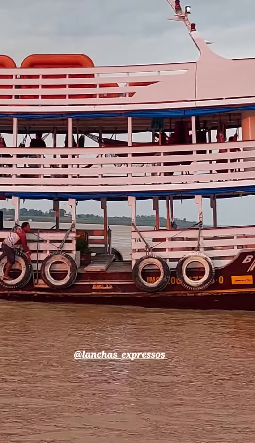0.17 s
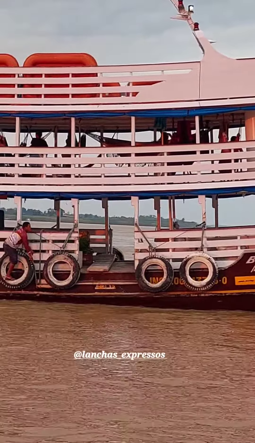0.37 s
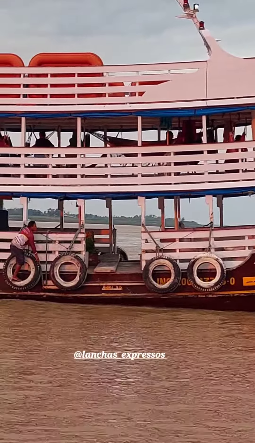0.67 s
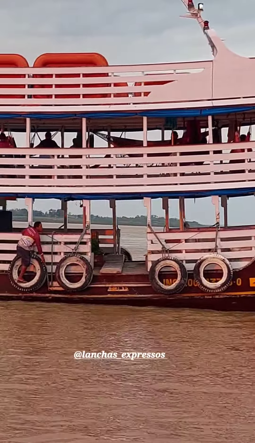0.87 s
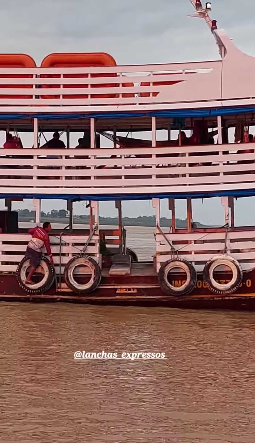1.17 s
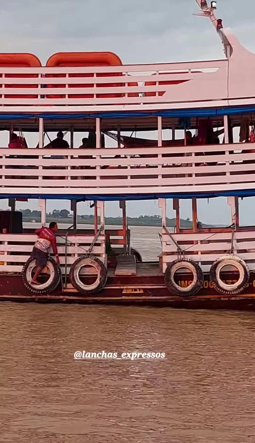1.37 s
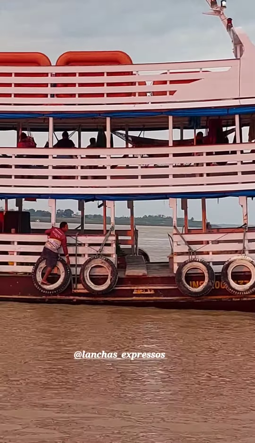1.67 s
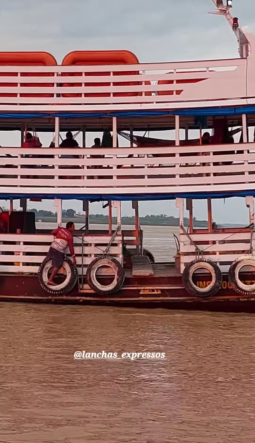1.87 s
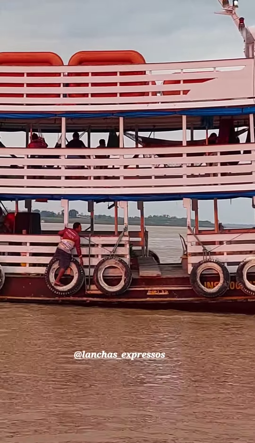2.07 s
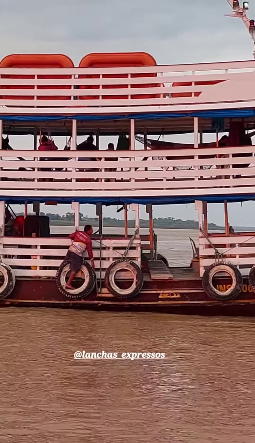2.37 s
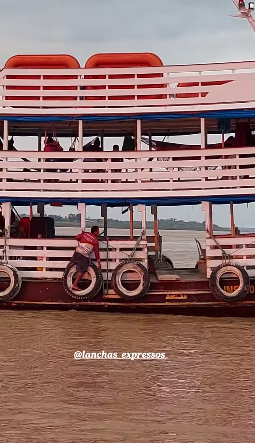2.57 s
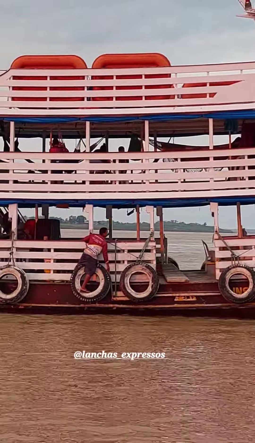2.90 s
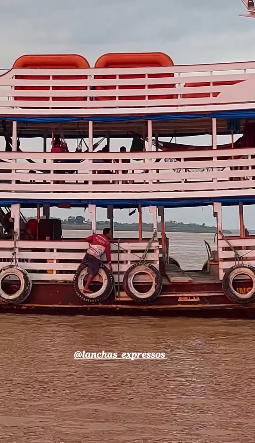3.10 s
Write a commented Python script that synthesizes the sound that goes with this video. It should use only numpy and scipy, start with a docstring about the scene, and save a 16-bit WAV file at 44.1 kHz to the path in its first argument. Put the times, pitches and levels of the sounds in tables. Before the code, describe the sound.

A riverboat's slow diesel chugs about fourteen times a second, each beat a deep thump with raspy exhaust and bright knock. Water wash and small splashes sit beneath, outdoors, with low wind rumble on the stereo microphone.

```python
"""Slow diesel on a river boat

A slow diesel fires about fourteen times a second. Each firing sets the exhaust pipe ringing with a thump,
sends a rasp of filtered noise from its mouth and knocks brightly in the block. Water washes along the hull
as noise and drops, with ringing bubbles, crackling splashes and three dull slaps, the first one faint.
Wind rumbles as lumpy low noise on the two microphone ports. The left port is duller and quieter than the right.
"""
import sys
import numpy as np
from scipy import signal
from scipy.fft import rfft, irfft, next_fast_len
from scipy.io import wavfile
from scipy.ndimage import uniform_filter1d

SR = 44100
rng = np.random.default_rng(int(sys.argv[2]) if len(sys.argv) > 2 else 0)


def wrap_up_sound(samples):
    """Save the sound to the file named by the first command line argument, as 16-bit audio."""
    columns = np.atleast_2d(samples).T
    # keep every value between -1 and 1, then stretch to whole-number steps
    tamed = np.clip(columns, -1, 1)
    steps = np.round(tamed * 32767).astype(np.int16)
    wavfile.write(sys.argv[1], SR, steps)


def how_loud(loudness_db):
    """Turn decibels into a plain amplitude multiplier (0 dB gives 1, 20 dB gives 10)."""
    steps = np.asarray(loudness_db, float) / 20
    return 10 ** steps


N = 142884  # length in samples

# Engine load over time, as level changes of its sounds: start_s, thump_db, upper_pipe_modes_db, rasp_db, knock_db
ENGINE_LOAD = [(0, -1, 1, -0.5, -2), (.35, -0.5, 0.5, -2, -1.5), (.9, 0.5, 0, 0, -1.5),
               (1.3, .5, 0.5, -2, 0), (1.65, -0.5, -2, -1.5, -1.5), (1.9, 0, -1, 0, -2),
               (2.3, -.5, -0.5, -0.5, -1.5), (3.24, -0.5, 1.5, -2.5, -1.5)]
# Ringing tones (modes) of exhaust pipe and hull: pitch_hz, level_db, t60_s (time to fade by 60 dB, one pass),
# sign (1 or -1), drift_db_per_s, swells (1 = rings through two equal resonances in a row)
PIPE_MODES = [(59.7, -10.6, .077, 1, -.5, 0), (71.2, -19.1, .33, 1, 0, 0), (77.8, -9.3, .065, -1, 0, 1),
              (103.9, -22.3, .33, -1, -2, 0), (148.1, -13.2, .122, -1, 0, 0),
              (244.5, -20.2, .13, -1, 2.2, 0), (297.7, -11.6, .028, 1, 0, 1), (390.9, -19.5, .057, 1, 1, 0)]
# Reflections of the thump: delay_s, gain (plain factor)
THUMP_ECHOES = [(.01665, .35)]
# Resonances of the gas rasp: pitch_hz, width_hz (one pass), level_db, left_lead_radians
RASP_RESONANCES = [(776, 243, -3, -1.32), (1158, 290, -4.5, -0.19), (1374, 208, 0.5, 1),
                   (1851, 146, 1, -1.3), (2097, 517, -0.5, .9)]
# Resonances of the knock: pitch_hz, width_hz (one pass), left_db, right_db, left_lead_radians
KNOCK_RESONANCES = [(4340, 1900, 2, 2, -1), (5090, 1130, 12.5, 3.5, -1.5), (5500, 660, 12, -3, 1),
                    (6680, 520, 13, 1, -1)]
# Vigour of the wash over time: start_s, level_db (relative)
WASH_VIGOUR = [(0, -46), (.3, -52), (.6, -56.5), (.9, -57.5), (1.15, -51), (1.5, -51), (1.9, -48.5),
               (2.25, -52), (2.55, -48.5), (2.8, -55.5), (3.24, -59)]
# Tone colour of wash and spray: pitch_hz, level_db (relative, per hertz)
WATER_COLOUR = [(480, 3), (750, -2.5), (1000, -1), (1400, -3), (1600, -5), (1850, -0.5), (2200, -5),
                (2600, -8.5), (3300, -10.5), (5000, -9), (5900, -13.5), (6700, -11.5), (7400, -19.5),
                (8500, -27), (10000, -21.5), (13500, -17.5), (15600, -16.5)]
# Splashes against the hull: peak_s, level_db (at the peak), length_s (fade time), lowest_hz
HULL_SPLASHES = [(0.890, -30, .002, 9000), (1.387, -23, 0.003, 9000), (1.573, -25, .002, 10000),
                 (1.708, -30, 0.068, 2520), (1.77, -26, 0.0036, 9000), (1.893, -27, 0.006, 9500),
                 (2.03, -30, 0.031, 2740), (2.106, -22.5, 0.023, 3000), (2.174, -23.5, 0.0033, 8500),
                 (2.283, -28, .003, 10100), (2.336, -24, .002, 9000), (2.458, -29.5, 0.03, 2880),
                 (2.492, -29.5, 0.023, 3180), (2.665, -26, 0.018, 3000), (2.806, -32.5, 0.006, 8950),
                 (3.072, -29.5, 0.0023, 9100)]
# Single bubbles that ring clearly: start_s, pitch_hz (at the start), level_db, t60_s
CLEAR_BUBBLES = [(.0605, 3220, -21.5, .028), (.058, 800, -27, .05)]
# Waves slapping the hull: start_s, level_db
HULL_SLAPS = [(1.627, -22), (1.64, -11.5), (1.726, -13.5)]
# Tone colour of the wind rumble: pitch_hz, level_db (relative, per hertz)
RUMBLE_COLOUR = [(20, -5), (42, 4.5), (70, 10), (130, 6), (300, 5), (400, -2), (600, -35.5)]
# Left port's response compared with the right: pitch_hz, level_db
LEFT_PORT_COLOUR = [(60, -3), (320, -3.5), (750, -4), (1200, -7.5), (1850, -9.5), (2200, -11), (2700, -3),
                    (4200, -5), (5000, -8), (5700, -5), (6700, -16), (8000, -23), (10000, -19.5),
                    (15000, -18.5)]

# Engine timing and chance differences between firings
FIRST_FIRING_S, FIRING_PERIOD_S, FIRING_JITTER_S = .01019, .0699651, .00008
FIRING_SPREAD_DB, MODE_SPREAD_DB = 0.43, 0.08
# Thump: modes above UPPER_MODES_HZ start later, and later still on the left
THUMP_DB, THUMP_CUT_HZ, UPPER_MODES_HZ = 0.5, 1600, 220
THUMP_LEAD_S, UPPER_LAG_S, UPPER_LEFT_LAG_S, ECHO_DB_PER_S = .00154, .00055, .0002, -2
# Rasp: a main puff and a weaker, longer tail; likeness is between the ports (1 = the same)
RASP_DB, RASP_SPREAD_DB, RASP_LIKENESS, RASP_DELAY_S = -23, 2.5, .88, 0.0034
RASP_RISE_S, RASP_FALL_S, RASP_TAIL_S, RASP_TAIL_DB = 0.00078, 0.0038, 0.019, -10.5
KNOCK_DB, KNOCK_SPREAD_DB, KNOCK_LIKENESS = -31.5, 1.5, .8
KNOCK_DELAY_S, KNOCK_RISE_S, KNOCK_FALL_S = 0.0037, 0.00061, 0.0036
EVEN_S = .006  # stretch over which rasp and knock noise is evened out
# Wash: "follows" is the share of the vigour swing heard in the lowest and highest octave
WASH_DB, WASH_FOLLOWS_LOW, WASH_FOLLOWS_HIGH, WASH_PATCHY_DB = 20, 0.16, 0.88, 1.5
WASH_LIKENESS, WASH_ALIKE_BELOW_HZ, PORT_LAG_S = 0.3, 900, .0001
DROPS_PER_S, DROP_SIZE_DB, DROPS_DB = 300, 4, -12  # rate at average vigour
BUBBLES_PER_S, BUBBLE_CYCLES, BUBBLES_DB, BUBBLES_FOLLOW = 120, 20, -47, 1
RUMBLE_DB, RUMBLE_LIKENESS, RUMBLE_LUMPS_DB = -31, 0.84, 2
SPRAY_GRAIN_DB, SPRAY_GRAINS_PER_S, SPRAY_HISS_DB = 4, 3000, -4
PLOP_RISE = 0.066  # share by which a clear bubble's pitch climbs within t60
SLAP_HZ, SLAP_T60_S = 122, 0.17


def rms_one(x):
    """Scale to an average strength (rms) of 1."""
    return x / np.sqrt(np.mean(x ** 2) + 1e-20)


def in_time(rows, s=None):
    """Read a table's columns at the given times, or at every sample."""
    t, *columns = np.transpose(rows)
    s = np.arange(N) / SR if s is None else s
    return [np.interp(s, t, column) for column in columns]


def coloured(x, points):
    """Shape the spectrum by points joined with lines on a log-pitch axis."""
    size = next_fast_len(N + 4096)
    hz, db = np.transpose(points)
    bins_hz = np.arange(size // 2 + 1) * SR / size
    gain = how_loud(np.interp(np.log(bins_hz + 1), np.log(hz), db))
    return irfft(rfft(x, size) * gain, size)[..., :N]


def drift(rate):
    """Slow random wander of spread 1: noise smoothed above about rate hertz."""
    r = np.exp(-80 * np.pi * rate / SR)  # made at every 40th sample
    noise = rng.standard_normal(N // 40 + 2002)
    slow = rms_one(signal.lfilter([1], [1, -2 * r, r * r], noise)[2000:])
    return np.interp(np.arange(N) / 40, np.arange(len(slow)), slow)


def clicks(s, gains):
    """Clicks of the given heights at the given times, after one second of run-in."""
    out = np.full(N + 2 * SR, 1e-18)
    out[np.round((s + 1) * SR).astype(int)] = gains
    return out


def ring(x, hz, t60):
    """A unit click sets a fading sine of starting height 1 ringing."""
    r, w = how_loud(-60 / (t60 * SR)), 2 * np.pi * hz / SR
    return signal.lfilter([0, np.sin(w)], [1, -2 * r * np.cos(w), r * r], x)


def resonance(x, hz, width):
    """Steep band-pass, one resonance applied twice; white noise keeps its rms."""
    r = np.exp(-np.pi * width / SR)
    row = [(1 - r * r) / 2, 0, (r * r - 1) / 2, 1, -2 * r * np.cos(2 * np.pi * hz / SR), r * r]
    return signal.sosfilt([row, row], x) * np.sqrt(2 * SR / width / np.pi)


def even_band(x, hz, width):
    """Noise in one resonance, its slow swells evened out so that strokes find much the same strength."""
    band = resonance(x, hz, width)
    power = uniform_filter1d(band ** 2, size=int(EVEN_S * SR))
    return band / np.sqrt(power + 0.37)


def puffs(s, gains, rise, fall):
    """An envelope that swells and dies after every click."""
    a, b = np.exp(-1 / (rise * SR)), np.exp(-1 / (fall * SR))
    dying = signal.lfilter([1], [1, -b], clicks(s, gains))
    return signal.lfilter([1 - a], [1, -a], dying)[SR:SR + N]


def port_pair(x, alike, lag=PORT_LAG_S):
    """Two unrelated signals become a partly alike pair; the left's shared part lags (leads if negative)."""
    alike = np.clip(alike, 0, 1)
    shared = np.roll(x[1], int(np.round(lag * SR)))
    return np.array([alike * shared + np.sqrt(1 - alike ** 2) * x[0], x[1]])


def thump(s, db, upper_db):
    """Each firing strikes the pipe modes; a reflection follows and weakens steadily over time."""
    spread = rng.normal(0, MODE_SPREAD_DB, (len(s), len(PIPE_MODES)))
    age = s - N / SR / 2  # time from the middle of the sound
    pipe = 0
    for k, (hz, level_db, t60, sign, db_per_s, swells) in enumerate(PIPE_MODES):
        upper = hz > UPPER_MODES_HZ
        gains = how_loud(db + level_db + db_per_s * age + spread[:, k] + upper_db * upper)
        mode = ring(clicks(s - THUMP_LEAD_S + UPPER_LAG_S * upper, gains), hz, t60)
        if swells:
            # the factor brings the peak back to about the height of a single ring
            mode = ring(mode, hz, t60) * 2 * np.e * np.log(1000) / (t60 * SR)
        left = np.roll(mode, int(UPPER_LEFT_LAG_S * SR) * upper)
        pipe = pipe + sign * np.array([left, mode])
    pipe = signal.sosfilt(signal.butter(2, THUMP_CUT_HZ, fs=SR, output="sos"), pipe)
    echoes = sum(gain * np.roll(pipe, int(lag * SR), axis=1) for lag, gain in THUMP_ECHOES)
    fading = how_loud(ECHO_DB_PER_S * (np.arange(N) - N / 2) / SR)
    return how_loud(THUMP_DB) * (pipe[:, SR:SR + N] + echoes[:, SR:SR + N] * fading)


def rasp(s, db):
    """Turbulent gas follows each thump: puffs of noise, every resonance with its own share each time."""
    gas, out = rng.standard_normal((2, N)), 0
    start = s + RASP_DELAY_S
    for hz, width, level_db, lead in RASP_RESONANCES:
        gains = how_loud(db + level_db + rng.normal(0, RASP_SPREAD_DB, len(s)))
        gate = puffs(start, gains, RASP_RISE_S, RASP_FALL_S)
        gate = gate + how_loud(RASP_TAIL_DB) * puffs(start, gains, RASP_RISE_S, RASP_TAIL_S)
        band = resonance(even_band(gas, hz, width) * gate, hz, 1.82 * width)
        band = band * np.sqrt(np.pi * width / SR)
        out = out + port_pair(band, RASP_LIKENESS, -lead / (2 * np.pi * hz))
    return how_loud(RASP_DB) * out


def knock(s, db):
    """A short bright rattle of the block at each firing: a burst of noise through high resonances."""
    gains = how_loud(db + rng.normal(0, KNOCK_SPREAD_DB, len(s)))
    gate = puffs(s + KNOCK_DELAY_S, gains, KNOCK_RISE_S, KNOCK_FALL_S)
    rattle, out = rng.standard_normal((2, N)), 0
    for hz, width, left_db, right_db, lead in KNOCK_RESONANCES:
        pair = port_pair(even_band(rattle, hz, width), KNOCK_LIKENESS, -lead / (2 * np.pi * hz))
        out = out + pair * how_loud(np.array([[left_db], [right_db]]))
    return how_loud(KNOCK_DB) * gate * out


def engine():
    """Firings at a nearly steady rate drive thump, rasp and knock."""
    s = FIRST_FIRING_S + FIRING_PERIOD_S * np.arange(-6, 47)  # early ones are already ringing at the start
    s = s + rng.normal(0, FIRING_JITTER_S, len(s))
    thump_db, upper_db, rasp_db, knock_db = in_time(ENGINE_LOAD, s)
    shared_db = rng.normal(0, FIRING_SPREAD_DB, len(s))
    blows = thump(s, thump_db + shared_db, upper_db)
    return blows + rasp(s, rasp_db + shared_db) + knock(s, knock_db + shared_db)


def water():
    """Hiss and small drops in octave bands; the high bands follow the vigour more, so strong wash is brighter."""
    vigour_db, = in_time(WASH_VIGOUR)
    swing = vigour_db - vigour_db.mean()
    sizes = how_loud(DROP_SIZE_DB * np.minimum(rng.exponential(1, (2, N)), 5)) * rng.choice([-1, 1], (2, N))
    drops = rms_one(sizes * (rng.random((2, N)) < DROPS_PER_S * how_loud(swing) / SR))
    mix = rng.standard_normal((2, N)) + how_loud(DROPS_DB) * np.diff(drops, prepend=0)
    hiss = rms_one(coloured(mix, WATER_COLOUR))
    out, together = 0, drift(8)
    edges = 250 * 2. ** np.arange(7)  # octave edges in Hz
    for k, (low, high) in enumerate(zip(edges, edges[1:])):
        follows = WASH_FOLLOWS_LOW + (WASH_FOLLOWS_HIGH - WASH_FOLLOWS_LOW) * k / 5
        band = signal.sosfiltfilt(signal.butter(2, [low, high], "band", fs=SR, output="sos"), hiss)
        band = port_pair(band, WASH_LIKENESS / (1 + (low / WASH_ALIKE_BELOW_HZ) ** 2))
        patches = together + 0.76 * drift(46)
        out = out + band * how_loud(follows * swing + WASH_PATCHY_DB * patches)
    return how_loud(vigour_db.mean() + WASH_DB) * out


def bubbles():
    """Small bubbles come in clumps and ring a few cycles; strong wash makes them more and louder."""
    vigour_db, = in_time(WASH_VIGOUR)
    swing = vigour_db - vigour_db.mean()
    sizes = how_loud(DROP_SIZE_DB * np.minimum(rng.exponential(1, N), 3)) * rng.choice([-1, 1], N)
    born = rng.random(N) < BUBBLES_PER_S * how_loud(swing + 4 * drift(10)) / SR
    pitches = np.geomspace(1000, 7000, 16)  # Hz
    dealt = rng.integers(0, 16, N)  # which pitch each bubble gets
    pans = how_loud(rng.normal(0, 3, (2, N)))
    rings = 0
    for k, hz in enumerate(pitches):
        strikes = pans * sizes * born * (dealt == k) + 1e-18
        rings = rings + ring(strikes, hz, BUBBLE_CYCLES / hz)
    return how_loud(BUBBLES_DB + BUBBLES_FOLLOW * swing) * rms_one(rings)


def wind():
    """Lumpy low noise, partly shared by the two ports."""
    noise = coloured(rng.standard_normal((3, N)), RUMBLE_COLOUR)
    rumble = np.sqrt(RUMBLE_LIKENESS) * noise[2] + np.sqrt(1 - RUMBLE_LIKENESS) * noise[:2]
    return rms_one(rumble) * how_loud(RUMBLE_DB + RUMBLE_LUMPS_DB * drift(10.5))


def splashes():
    """Short swells of crackling spray, each with its own brightness, and a few bubbles of rising pitch."""
    t, out = np.arange(N) / SR, np.zeros((2, N))
    sizes = how_loud(SPRAY_GRAIN_DB * np.minimum(rng.exponential(1, (2, N)), 3)) * rng.choice([-1, 1], (2, N))
    grains = sizes * (rng.random((2, N)) < SPRAY_GRAINS_PER_S / SR)
    spray = rms_one(grains) + how_loud(SPRAY_HISS_DB) * rng.standard_normal((2, N))
    spray = coloured(spray, WATER_COLOUR)
    for s, db, length, low_hz in HULL_SPLASHES:
        near = slice(int((s - 3 * length) * SR), int((s + 8 * length) * SR))
        grit = signal.sosfilt(signal.butter(2, low_hz, "high", fs=SR, output="sos"), spray[:, near])
        distance = np.where(t[near] < s, 3 * (s - t[near]), t[near] - s)  # rises three times as fast as it falls
        out[:, near] += how_loud(db) * rms_one(grit) * np.exp(-distance / length)
    for s, hz, db, t60 in CLEAR_BUBBLES:
        age = np.maximum(t - s, 0)
        envelope = how_loud(db - 60 * age / t60) * np.minimum(age / 0.00068, 1)
        out += envelope * np.sin(2 * np.pi * hz * age * (1 + PLOP_RISE * age / t60 / 2))
    return out


def slaps():
    """Waves slap the hull: soft blows ring one low panel."""
    s, db = np.transpose(HULL_SLAPS)
    return ring(clicks(s, how_loud(db)), SLAP_HZ, SLAP_T60_S)[SR:SR + N]


def scene():
    """Engine, water and wind as they reach the two ports."""
    return engine() + water() + bubbles() + wind() + splashes() + slaps()


def low_pass(x):
    """Removes everything above the highest recorded frequency."""
    return signal.sosfilt(signal.butter(12, 15730, fs=SR, output="sos"), x)


def record(dry):
    """The left port colours its channel, then the lowest and highest pitches are cut on both."""
    ports = np.array([coloured(dry[0], LEFT_PORT_COLOUR), dry[1]])
    ports = signal.sosfilt(signal.butter(3, 30, "high", fs=SR, output="sos"), ports)
    # 60 dB down from 15800 Hz up
    ports = signal.sosfilt(signal.cheby2(14, 60, 15800, fs=SR, output="sos"), ports)
    return low_pass(ports)


dry = scene()
out = record(dry)
wrap_up_sound(out)
```